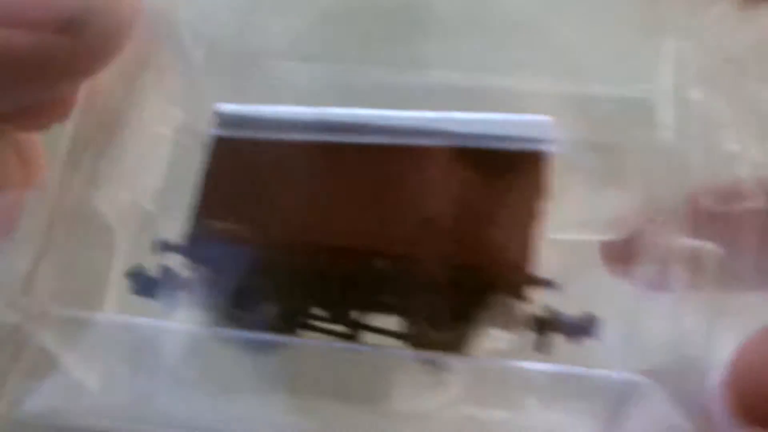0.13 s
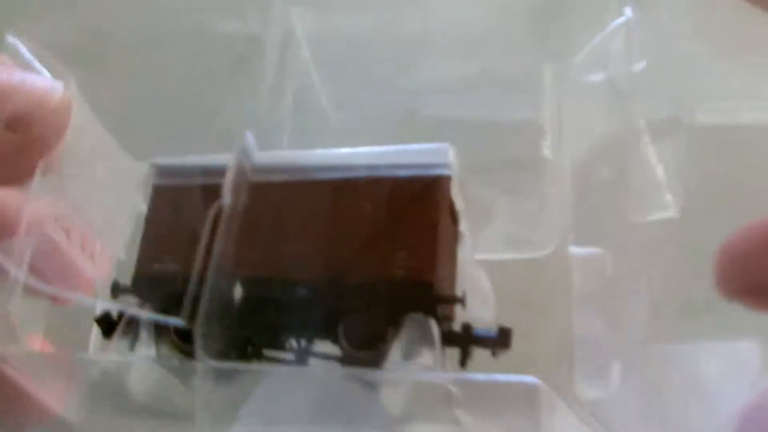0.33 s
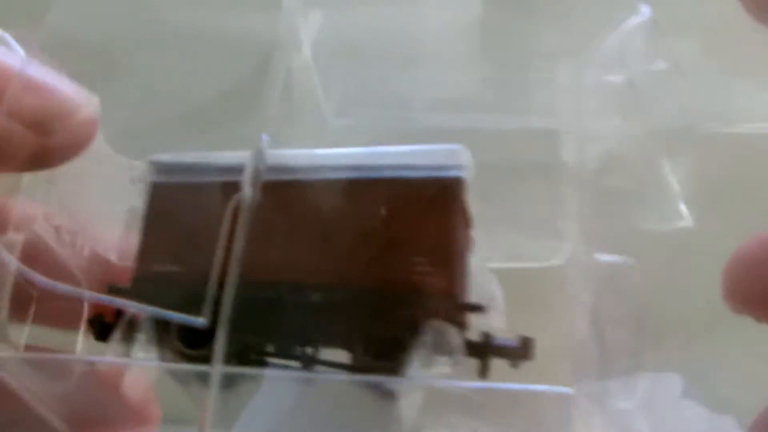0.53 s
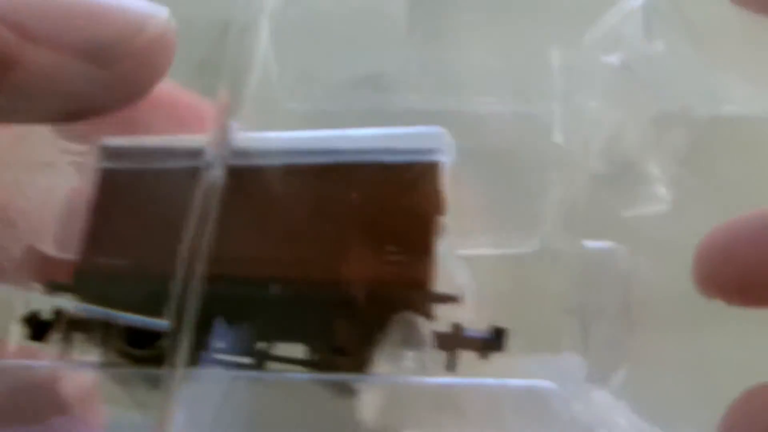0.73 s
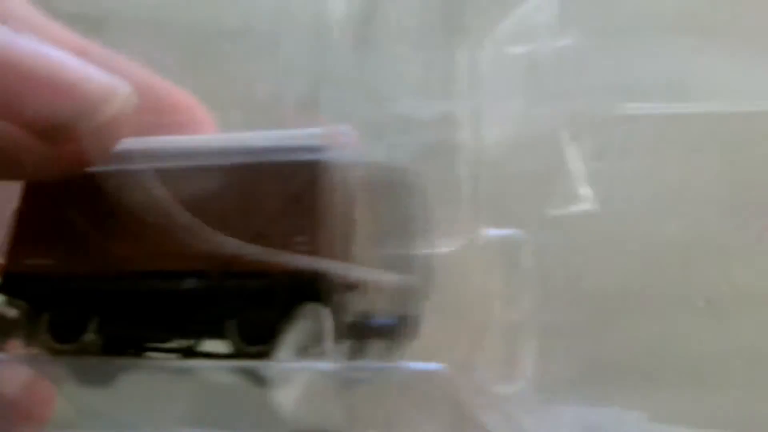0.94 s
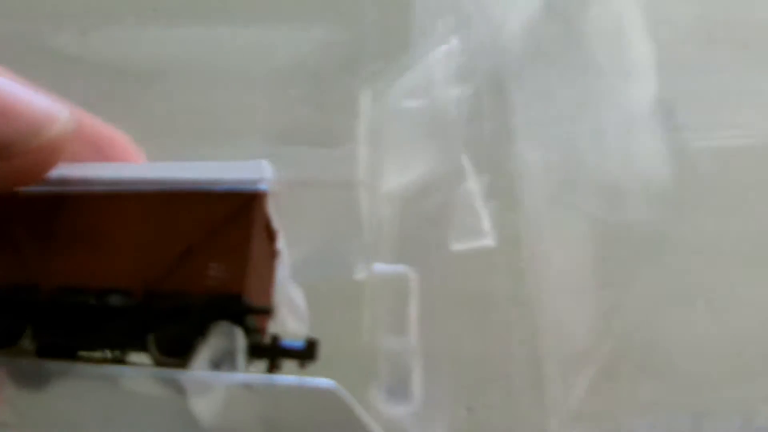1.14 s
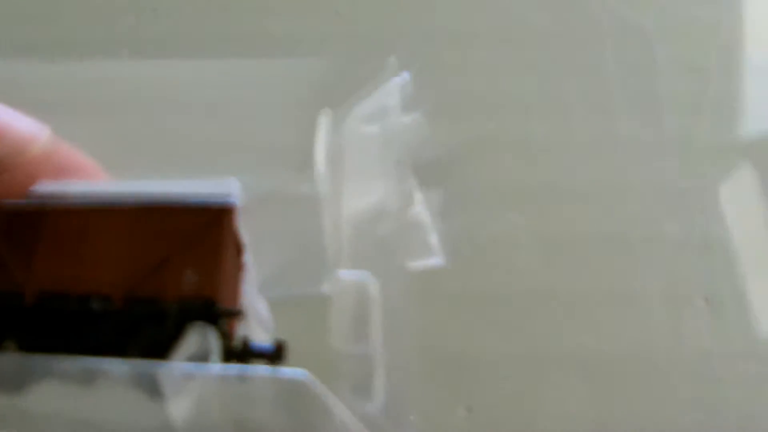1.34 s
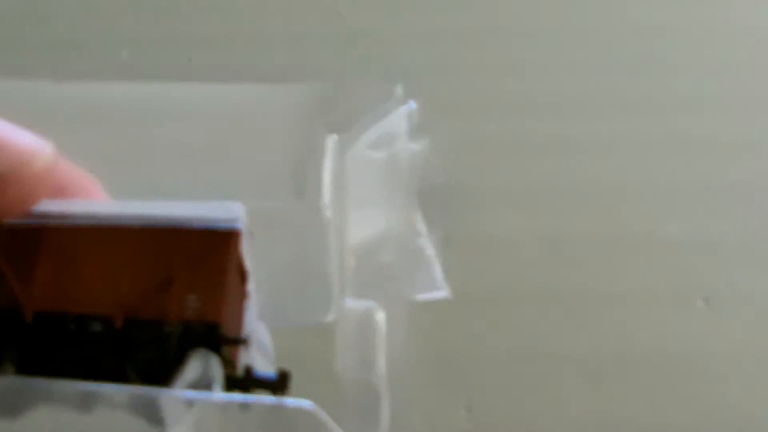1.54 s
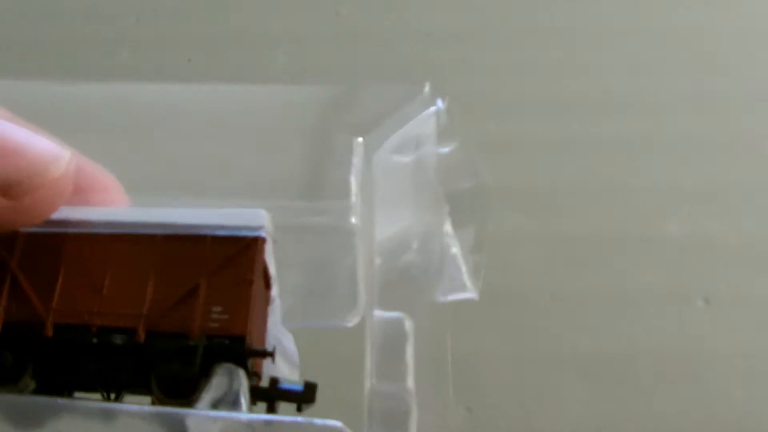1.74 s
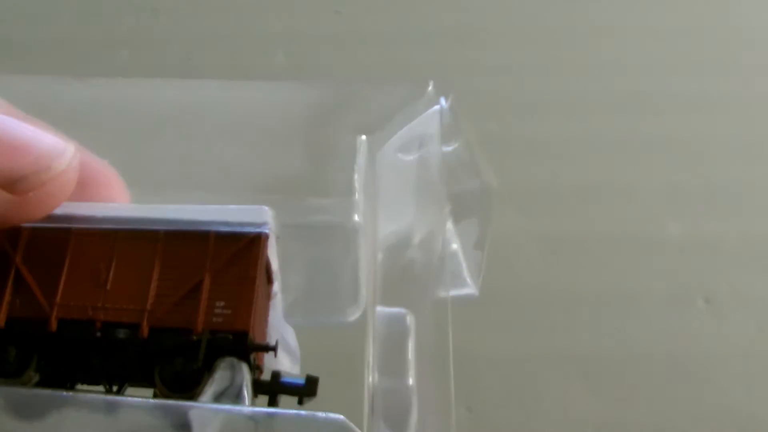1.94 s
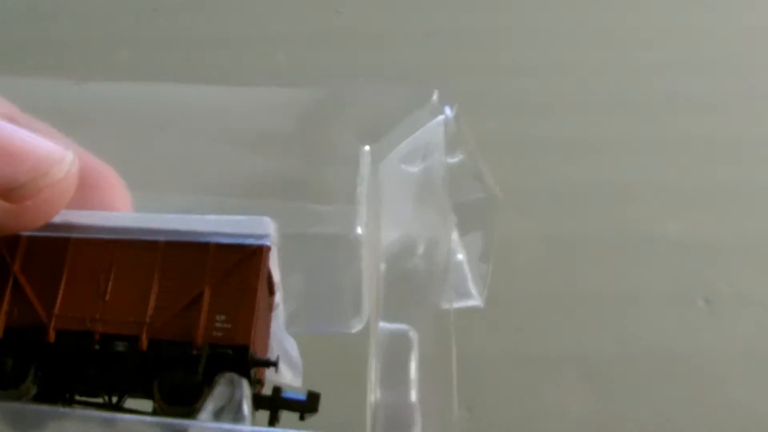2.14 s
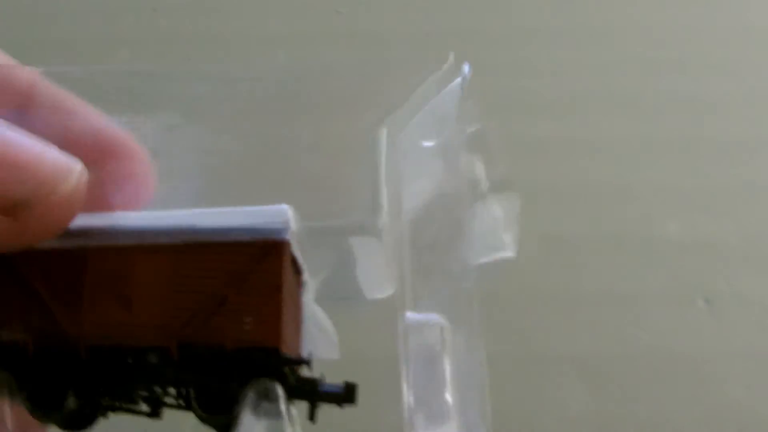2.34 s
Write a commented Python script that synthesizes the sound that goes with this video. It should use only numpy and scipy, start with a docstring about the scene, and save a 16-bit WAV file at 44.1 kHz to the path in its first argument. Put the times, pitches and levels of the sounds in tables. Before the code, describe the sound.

Close stereo microphones in a small room catch clear packaging being handled: short rubbing, a bright double crack from the catch, scraping and ticking plastic, near quiet, then paired hollow knocks, faint rustling and a muffled settling thump.

```python
"""A loud double snap is the main sound: a plastic catch springs free, as noise cracks with ringing modes.
Around it a clear sleeve is worked off a moulded tray, close by in a small room. The thin sheet
crinkles in short struck ticks, among scrapes and rubbing built from many tiny slips.
Two hollow knocks, ringing with the tray's modes, and a light rustle of dense noise grains follow.
Faint room air, made of coloured noise, lies under everything."""
import sys
import numpy as np
from scipy import signal
from scipy.fft import rfft, irfft
from scipy.io import wavfile

SR = 44100
rng = np.random.default_rng(int(sys.argv[2]) if len(sys.argv) > 2 else 0)


def dump_mix(stems):
    """Bounce the given channels to the path in sys.argv[1] as a 16-bit WAV at rate SR."""
    frames = np.atleast_2d(stems).T  # one column per channel
    limited = np.clip(frames, -1, 1)  # hard clip at full scale
    pcm = np.round(limited * 32767).astype(np.int16)
    wavfile.write(sys.argv[1], SR, pcm)


N = 110250
T = np.arange(N) / SR  # time in seconds


def amp(db):
    """Turns decibels into an amplitude factor."""
    return 10 ** (np.asarray(db) / 20)


def unit(x):
    """Scales a sound to energy 1."""
    return x / np.sqrt(np.sum(x ** 2) + 1e-20)


def read(points, hz):
    """Reads a table at any pitch, with straight lines along a log-frequency axis."""
    f, value = np.transpose(points)
    return np.interp(np.log(hz + 1), np.log(f + 1), value)


def level(points):
    """Draws a level curve as gain, silent outside its span."""
    return amp(np.interp(T, *np.transpose(points), left=-np.inf, right=-np.inf))


def add(mix, start_s, sound):
    """Adds a sound into the mix in place, cut off at the end of the mix."""
    part = mix[round(start_s * SR):][:len(sound)]
    part += sound[:len(part)]


def colour(x, points, tilt_db=0, pivot_hz=400):
    """Filters by a spectrum table and a tilt per octave above the pivot, without sounding early."""
    hz = np.fft.rfftfreq(4096, 1 / SR)
    db = read(points, hz) + tilt_db * np.log2(np.maximum(hz / pivot_hz, 1))
    log_gain = np.log(amp(np.r_[db, db[-2:0:-1]]))
    # Minimum phase puts the filter's response right after each sound begins.
    taps = np.fft.ifft(np.exp(np.conj(signal.hilbert(log_gain)))).real
    return signal.fftconvolve(x, taps[:len(hz)])[:len(x)]


def tilted(x, tilt_db):
    """Brightens or dulls a sound above the sheet's main resonance; energy 1."""
    return unit(colour(x, [(1, 0)], tilt_db, pivot_hz=1310))


def burst(fade_s):
    """Makes noise that dies away, with a nearly even spectrum and energy 1."""
    t = T[:SR // 5]
    fade = np.exp(-t / max(fade_s, 1e-5))
    x = rng.standard_normal(len(t)) * fade
    for _ in range(3):  # even out the spectrum, then restore the fade
        z = rfft(x)
        x = irfft(z / (abs(z) + 1e-12), len(t)) * np.sqrt(fade)
    return unit(x)


def ring_mode(t, pitch_hz, t60_s):
    """One resonance: a sine that loses 60 dB in t60_s; energy 1."""
    return unit(np.sin(2 * np.pi * pitch_hz * t) * np.exp(-np.log(1000) * t / t60_s))


def strike(spectrum, modes, modes_db, crack_s, ring_db, ring_s):
    """Plastic answers a blow with a crack, a dense short ring and a few clear modes; energy 1."""
    t = T[:SR // 5]
    noise = burst(crack_s) + amp(ring_db) * burst(ring_s)
    dense = unit(colour(noise, spectrum))
    clear = np.zeros(len(t))
    for pitch_hz, level_db, t60_s in modes:
        clear += amp(level_db) * rng.choice([-1, 1]) * ring_mode(t, pitch_hz, t60_s)
    return unit(dense + amp(modes_db) * clear)


def grains(per_s, spread_db):
    """Random tiny slips of unequal size, rms 1."""
    size = amp(spread_db * np.minimum(rng.exponential(1, N), 3)) * rng.choice([-1, 1], N)
    happens = rng.random(N) < per_s / SR
    return unit(size * happens) * np.sqrt(N)


def rattle(fade_s, per_s, spread_db):
    """Loose plastic chatters: tiny contacts that swell and die away."""
    chatter = grains(per_s, spread_db)
    return chatter * (np.exp(-T / fade_s) - np.exp(-2 * T / fade_s))


# Colour of the room air and hiss: pitch_hz, level_db
AIR_COLOUR = [(15, -62), (25, -18), (240, -9), (400, -4), (16000, -13)]
# Strength of the left-right difference by pitch, for the air and the plastic: pitch_hz, level_db
STEREO_WIDTH = [(300, -23), (1200, -20), (5000, -12), (16000, -7.5)]


def room_air(side_db):
    """Quiet room air and hiss: coloured noise with a separate noise for the stereo difference."""
    mid = colour(rng.standard_normal(N), AIR_COLOUR)
    side = colour(rng.standard_normal(N), AIR_COLOUR)
    side = amp(side_db) * colour(side, STEREO_WIDTH)
    air_db = -66.5  # rms of the part shared by both channels
    return amp(air_db) * np.array([mid + side, mid - side]) / np.std(mid)


# How long the room's tail takes to drop 60 dB: pitch_hz, t60_s
ROOM_FADE = [(300, 0.523), (1100, 0.35), (7000, 0.32), (16000, 0.24)]


def room(x):
    """Near surfaces answer with a short burst, alongside a longer tail dying band by band."""
    tail_db, early_db, delay_s = -13, -10.5, 0.009
    hz, t, z = signal.stft(rng.standard_normal(SR // 2), SR, nperseg=256)
    fade = np.exp(-np.log(1000) * t / read(ROOM_FADE, hz)[:, None])
    tail = signal.istft(z * fade, SR)[1]
    echo = np.zeros(SR)
    add(echo, delay_s, amp(tail_db) * unit(tail))
    add(echo, delay_s, amp(early_db) * burst(fade_s=0.02))
    return signal.fftconvolve(x, echo)[:N]


def place(x, left_db, spread_db, wet_db):
    """Two close microphones: bass nearly alike, treble out of step and leaning to one side."""
    mid = x + amp(wet_db) * room(x)
    # A quarter-cycle shift and a second, independent echo make the channels differ.
    apart = amp(spread_db) * signal.hilbert(x).imag + amp(wet_db + 1.0) * room(x)
    width = amp(read(STEREO_WIDTH, np.fft.rfftfreq(N, 1 / SR)))
    side = irfft(rfft(apart) * width, N)
    treble_band = signal.butter(1, [3000, 13000], "band", fs=SR, output="sos")
    treble = signal.sosfiltfilt(treble_band, x)
    side = side + np.tanh(np.log(amp(left_db)) / 2) * treble
    return np.array([mid + side, mid - side])


def bump():
    """A hand softly bumps the tray: a low sine that swells and fades."""
    start_s, length_s, pitch_hz, level_db = 0.05, 0.085, 148, -59.5
    out = np.zeros(N)
    t = T[:round(length_s * SR)]
    add(out, start_s, amp(level_db) * np.sin(2 * np.pi * pitch_hz * t) * np.hanning(len(t)))
    return out


# Dull thumps as the tray settles: start_s, energy_db
SETTLING_THUMPS = [(1.9304, -14), (1.9374, -10), (1.944, -17.5)]
# Colour of a thump: pitch_hz, level_db
DULL_COLOUR = [(30, -18.5), (90, -16.5), (165, 1.5), (420, 4.5), (600, -1), (1200, -0.5), (2200, -20),
               (16000, -42)]
# Low resonances of the cushioned tray: pitch_hz, level_db, t60_s
CUSHIONED_TRAY_MODES = [(210, -3, .07), (395, -1, .06)]


def thumps():
    """The tray settles with dull thumps that ring in its low, cushioned modes."""
    out = np.zeros(N)
    for start_s, energy_db in SETTLING_THUMPS:
        thump = strike(DULL_COLOUR, CUSHIONED_TRAY_MODES, modes_db=-6.5,
                       crack_s=0.0078, ring_db=-3.5, ring_s=0.02)
        add(out, start_s, amp(energy_db) * thump)
    return out


# Hard hollow knocks: start_s, energy_db, brightness_db_per_octave
HOLLOW_KNOCKS = [(1.649, -7, 1.5), (1.6512, -4.5, 0)]
# Colour of a knock and its chatter: pitch_hz, level_db
HOLLOW_COLOUR = [(30, -24.5), (100, -11.5), (230, -1), (350, 4.5), (520, -0.5), (800, 4), (1300, -0.5),
                 (2050, -6.5), (2700, -4.5), (10000, -7.5), (16000, -25)]
# Resonances of the tray: pitch_hz, level_db, t60_s
TRAY_RESONANCES = [(242, -19.5, 0.084), (350, -15, 0.088), (827, -10.5, 0.05), (1715, -8.5, 0.044),
                   (2020, -11.5, 0.026), (9800, -15, 0.013)]


def knocks():
    """The hollow packaging rings when knocked, and the loose tray chatters after each blow."""
    chatter_db = -13  # relative to the knock
    out = np.zeros(N)
    for start_s, energy_db, tilt_db in HOLLOW_KNOCKS:
        blow = strike(HOLLOW_COLOUR, TRAY_RESONANCES, modes_db=6, crack_s=0.0046, ring_db=0, ring_s=0.017)
        add(out, start_s, amp(energy_db) * tilted(blow, tilt_db))
        chatter = rattle(fade_s=0.047, per_s=400, spread_db=3)
        chatter = unit(colour(chatter, HOLLOW_COLOUR, tilt_db=-1))
        add(out, start_s, amp(energy_db + chatter_db) * chatter)
    return out


# Hollow body of the tray as it drags: time_s, level_db
DRAG_LEVEL = [(0.43, -62), (0.455, -48.5), (0.5, -67.5), (0.58, -60.5), (0.78, -60.5), (0.87, -51),
              (0.99, -55), (1.07, -75)]
# Colour of the drag: pitch_hz, level_db
DRAG_TONE = [(70, -40), (150, -13), (240, 2.5), (420, -0.5), (820, -2), (1300, -15), (16000, -35)]
# Resonances of the dragged tray: pitch_hz, level_db, t60_s
DRAGGED_TRAY_MODES = [(342, -8, 0.059), (522, -3.5, 0.14), (770, -4.5, 0.02)]


def drag():
    """Tiny slips set the hollow tray ringing as it drags."""
    hollow = strike(DRAG_TONE, DRAGGED_TRAY_MODES, modes_db=-1.5, crack_s=0.0026, ring_db=-7, ring_s=0.012)
    slips = grains(per_s=900, spread_db=3.5)
    ringing = signal.fftconvolve(slips, hollow)[:N]
    return np.sqrt(N) * unit(ringing) * level(DRAG_LEVEL)


# Fingers brushing the sheet: time_s, level_db
BRUSH_LEVEL = [(1.66, -53), (1.70, -55), (1.75, -60.5), (1.81, -67), (1.87, -60), (1.912, -54.5),
               (1.98, -64)]
# Colour of the thin sheet, for every sheet sound below: pitch_hz, level_db
SHEET_TONE = [(40, -35.5), (130, -15), (450, -9.5), (1120, 2.5), (1550, -0.5), (2100, -3), (2600, -6.5),
              (3500, -5.5), (4400, -12), (10000, -13.5), (16000, -31)]


def brush():
    """Fingers brush the sheet in a light rustle of very dense grains."""
    rustle = colour(grains(per_s=7200, spread_db=4.0), SHEET_TONE, tilt_db=4.0)
    return np.sqrt(N) * unit(rustle) * level(BRUSH_LEVEL)


def stick_slip():
    """Friction grips and lets go unevenly: a gain of rms 1."""
    points_per_s, depth_db = 120, 5.5
    knots = np.clip(rng.standard_normal(4096), -2, 2)
    wander = np.interp(T * points_per_s, np.arange(len(knots)), knots)
    return unit(amp(depth_db * wander)) * np.sqrt(N)


# Rubbing force of the sleeve on the tray: time_s, level_db
RUB_FORCE = [(0.04, -54.5), (0.06, -47), (0.11, -47.5), (0.19, -54.5), (0.5, -63.5), (0.585, -57),
             (0.63, -66.5), (0.73, -57), (0.87, -59), (0.9, -53), (0.995, -50.5), (1.02, -86)]
# Resonances of the sleeve, for the rub, scrapes and ticks: pitch_hz, level_db, t60_s
SLEEVE_RESONANCES = [(786, -15, 0.0393), (1182, -7.5, 0.045), (1997, -12, 0.015), (3696, -11.5, .02),
                     (6840, -32, .012)]


def rub():
    """Grainy friction rings the sleeve, with more treble under pressure."""
    out, grip, force = 0, stick_slip(), level(RUB_FORCE)
    for _ in range(4):  # each spot of the sheet rings a little differently
        spot = strike(SHEET_TONE, SLEEVE_RESONANCES, modes_db=2, crack_s=0.00087, ring_db=-9, ring_s=0.0069)
        slips = grains(per_s=500, spread_db=0.0) * grip * force
        out += signal.fftconvolve(slips, tilted(spot, tilt_db=2.0))[:N] / 2
    # Light pressure weakens the treble above 3400 Hz.
    soft = signal.sosfiltfilt(signal.butter(4, 3400, fs=SR, output="sos"), out)
    return soft + np.sqrt(force / force.max()) * (out - soft)


def sliding():
    """Rubbing, dragging and brushing together, with little bass."""
    no_bass = signal.butter(2, 160, "high", fs=SR, output="sos")
    return signal.sosfilt(no_bass, rub() + drag() + brush())


# An edge squeaks as it catches: start_s, length_s, pitch_hz, level_db
EDGE_SQUEAKS = [(0.8396, 0.0073, 3570, -33.5), (0.8433, 0.0143, 2094, -39)]


def squeaks():
    """A catching edge squeaks: short steady sines with soft ends."""
    out = np.zeros(N)
    for start_s, length_s, pitch_hz, level_db in EDGE_SQUEAKS:
        t = T[:round(length_s * SR)]
        tone = np.sqrt(2) * np.sin(2 * np.pi * pitch_hz * t)
        add(out, start_s, amp(level_db) * tone * signal.windows.tukey(len(t), .5))
    return out


# Short scrapes of sheet on sheet: start_s, length_s, level_db
SHEET_SCRAPES = [(0.071, 0.0098, -45), (0.095, 0.007, -46), (0.438, 0.0092, -40), (0.75, 0.008, -48.5),
                 (0.776, 0.0076, -39), (0.8, 0.0053, -44), (0.812, 0.019, -44), (0.8404, 0.009, -34),
                 (0.8784, 0.004, -34), (0.905, .03, -46.5), (0.949, 0.006, -43.5), (0.974, 0.0058, -39.5),
                 (0.9905, 0.0027, -46.5), (0.997, 0.004, -40), (1.812, 0.0078, -46.5)]


def scrapes():
    """Quick uneven runs of slips strike the sleeve and make it ring."""
    slips_per_s, timing_jitter, spread_db = 1400, 0.38, -3  # jitter is in natural-log units
    out = np.zeros(N)
    for start_s, length_s, level_db in SHEET_SCRAPES:
        gap, size = rng.standard_normal((2, 64))
        at_s = np.r_[0, np.cumsum(np.exp(timing_jitter * gap))[:-1]] / slips_per_s
        push = amp(spread_db * size) * rng.choice([-1, 1], len(at_s))
        inside = at_s < length_s
        slips = np.zeros(round(length_s * SR) + 1)
        slips[(at_s[inside] * SR).astype(int)] = push[inside]
        sheet = strike(SHEET_TONE, SLEEVE_RESONANCES, modes_db=1.0, crack_s=0.0027, ring_db=-8.0, ring_s=0.014)
        run = tilted(signal.fftconvolve(slips, sheet), tilt_db=2.5)
        # Longer scrapes get more energy, so the level describes loudness rather than total energy.
        add(out, start_s, amp(level_db) * np.sqrt(len(slips)) * run)
    return out


# Creases popping and edges ticking: start_s, energy_db, brightness_db_per_octave
CREASE_CLICKS = [(0.0464, -24, -11), (0.0966, -11.5, 4.5), (0.137, -12.5, 7), (0.1558, -19, 4),
                 (0.2085, -15.5, -4), (0.297, -17, 0), (0.416, -26, 2), (0.4275, -14, -1),
                 (0.4302, -13, -3), (0.4449, -13, -1), (0.661, -29.5, 1), (0.741, -24.5, -0.5),
                 (0.8878, -16.5, -3.5), (0.9081, -20, -0.5), (0.9205, -16, 0), (0.9575, -15, -2.5),
                 (0.999, -19, -9), (1.031, -27.5, 2.5), (1.089, -29, -13.5), (1.489, -32, -6),
                 (1.519, -27, -4.5), (1.745, -27, 2.5), (1.8286, -20, 1), (1.932, -21.5, 4.5),
                 (2.007, -35, -2.5), (2.069, -34, -8.5), (2.101, -31, 2)]


def clicks():
    """Small creases pop and edges tick, each a short blow to the sleeve."""
    out = np.zeros(N)
    for start_s, energy_db, tilt_db in CREASE_CLICKS:
        tick = strike(SHEET_TONE, SLEEVE_RESONANCES, modes_db=-3, crack_s=.002, ring_db=-3, ring_s=.012)
        add(out, start_s, amp(energy_db) * tilted(tick, tilt_db))
    return out


# The catch letting go: start_s, energy_db, crack_s (fade setting of the crack), ring_db
CATCH_SNAPS = [(0.223, 7, 0.0012, -2.5), (0.2339, 6.5, 0.0024, -15.5)]
# Colour of a snap: pitch_hz, level_db
SNAP_TONE = [(40, -27.5), (400, -31), (1100, -1.5), (1600, -4), (2700, -5), (3600, -11.5), (7000, -2.5),
             (8200, -8.5), (10000, 0.5), (10900, 0), (12400, -9.5), (16000, -21.5)]
# Resonances of the catch: pitch_hz, level_db, t60_s
CATCH_RESONANCES = [(1190, -16.5, 0.042), (2084, -13.5, 0.054), (2950, -11, 0.016), (4720, -9, 0.0061),
                    (7100, -12, .01), (8990, -12.5, 0.012), (11140, -4.5, 0.0037)]


def snaps():
    """The catch buckles and springs free with a ringing crack, and the whole sleeve shudders."""
    shudder_db = -12.5  # relative to the snap
    out = np.zeros(N)
    for start_s, energy_db, crack_s, ring_db in CATCH_SNAPS:
        snap = strike(SNAP_TONE, CATCH_RESONANCES, modes_db=1, crack_s=crack_s, ring_db=ring_db, ring_s=0.0081)
        add(out, start_s, amp(energy_db) * snap)
        shudder = rattle(fade_s=0.021, per_s=900, spread_db=4)
        shudder = unit(colour(shudder, SHEET_TONE, tilt_db=2.0))
        add(out, start_s, amp(energy_db + shudder_db) * shudder)
    return out


def scene():
    """Places the handling and the snaps in the room, over the room air."""
    handling = clicks() + scrapes() + squeaks() + sliding() + knocks() + thumps() + bump()
    catch = place(snaps(), left_db=4.0, spread_db=3.5, wet_db=-2.0)
    handling = place(handling, left_db=0.5, spread_db=1.0, wet_db=-1.5)
    return catch + handling + room_air(side_db=12.5)


def record(dry):
    """The recorder's ceiling clips the peaks, then its band limit removes sound above about 16 kHz."""
    low_pass = signal.firwin(255, 16000, window=("kaiser", 9), fs=SR)
    return signal.oaconvolve(np.clip(dry, -1, 1), low_pass[None], "same")


dry = scene()
out = record(dry)
dump_mix(out)
```